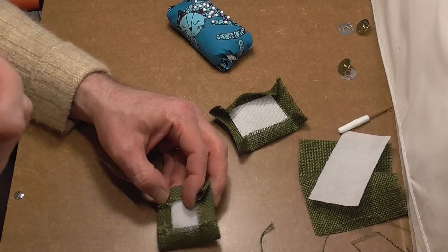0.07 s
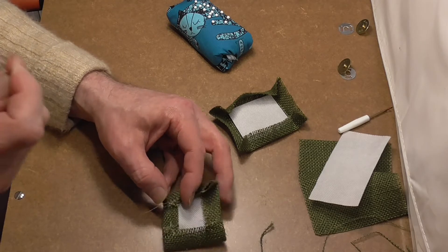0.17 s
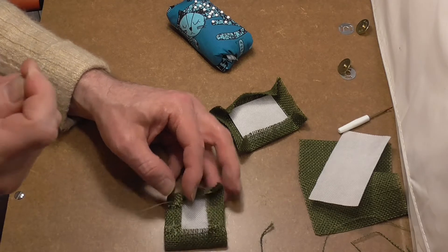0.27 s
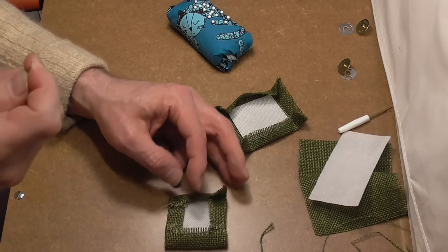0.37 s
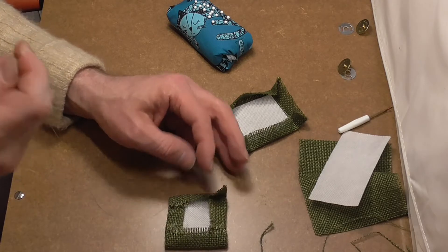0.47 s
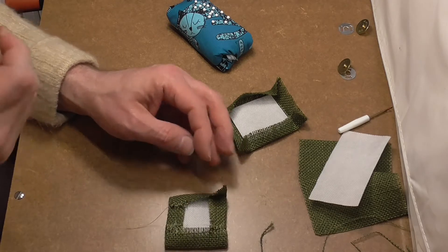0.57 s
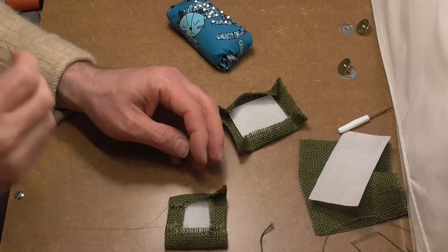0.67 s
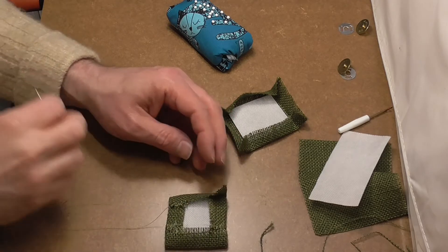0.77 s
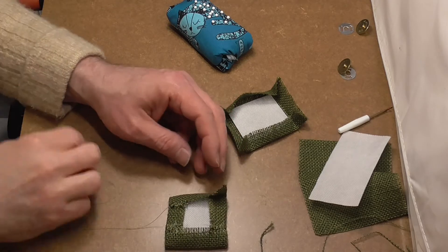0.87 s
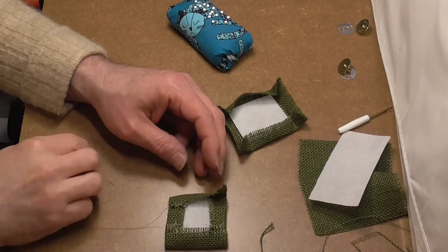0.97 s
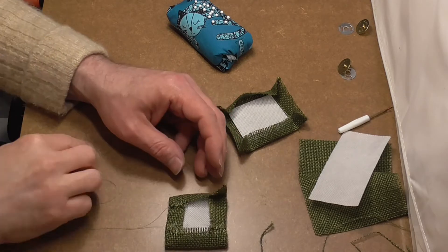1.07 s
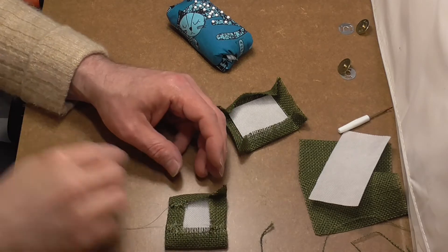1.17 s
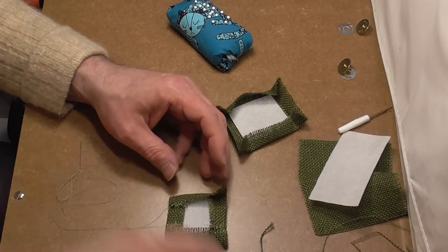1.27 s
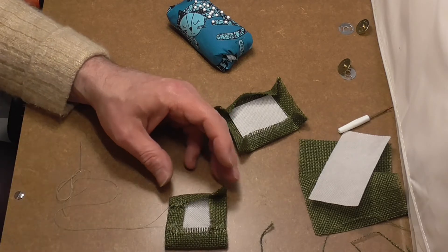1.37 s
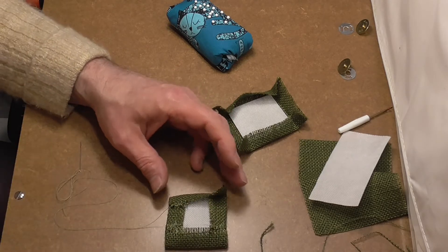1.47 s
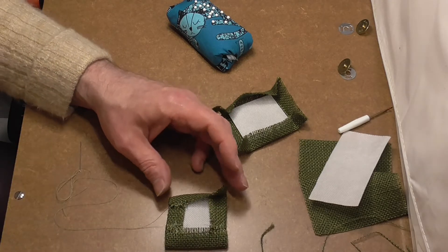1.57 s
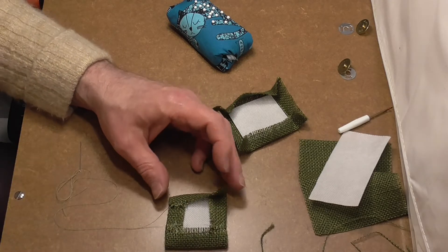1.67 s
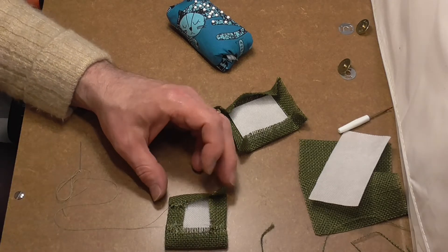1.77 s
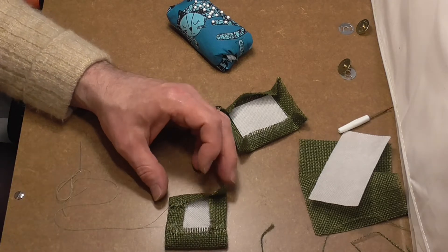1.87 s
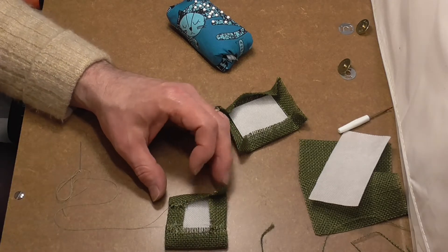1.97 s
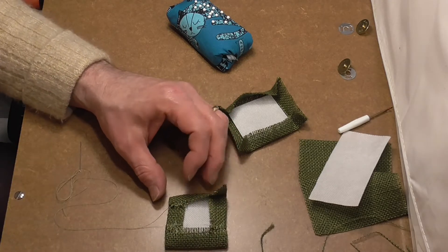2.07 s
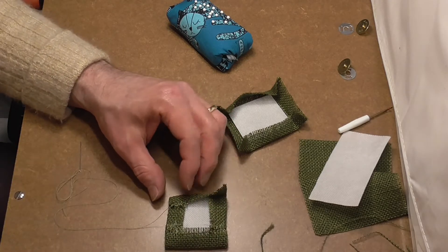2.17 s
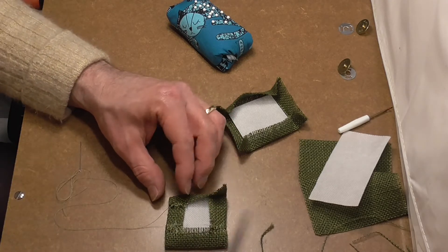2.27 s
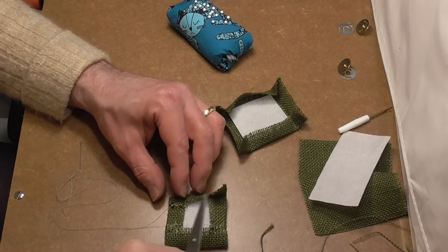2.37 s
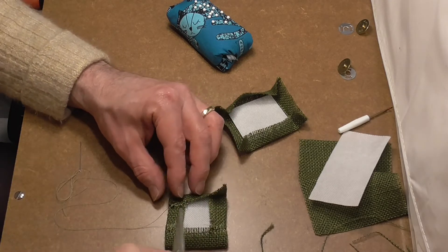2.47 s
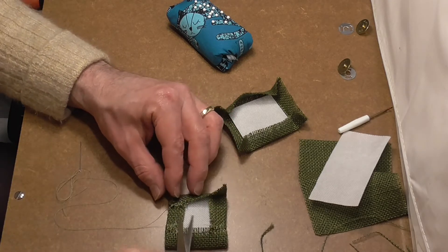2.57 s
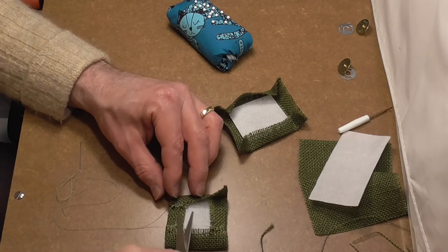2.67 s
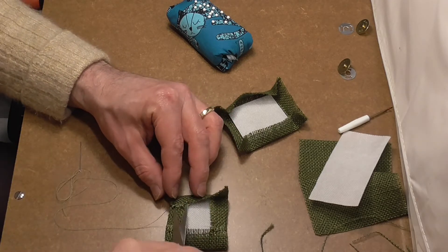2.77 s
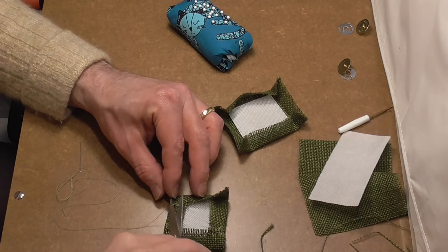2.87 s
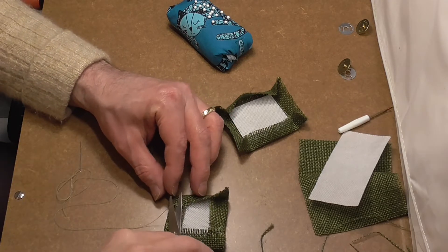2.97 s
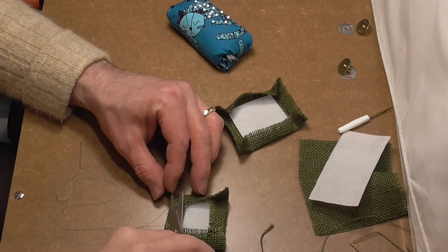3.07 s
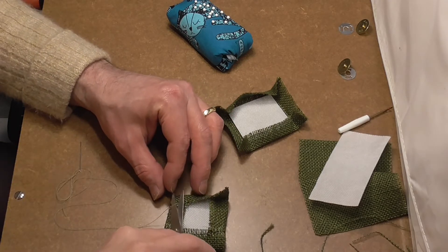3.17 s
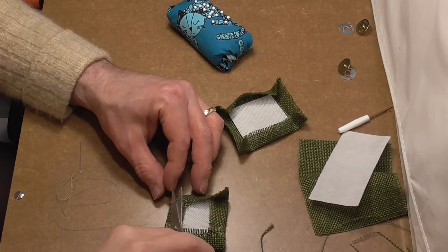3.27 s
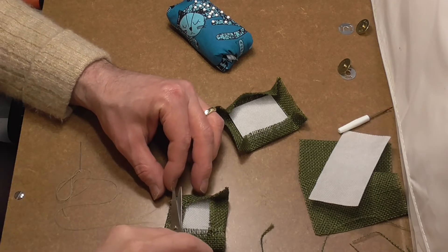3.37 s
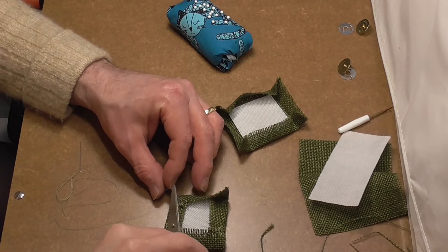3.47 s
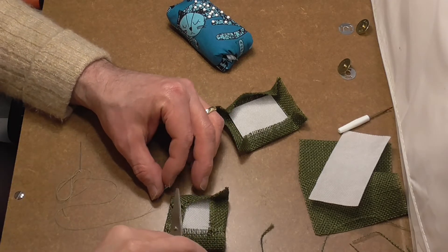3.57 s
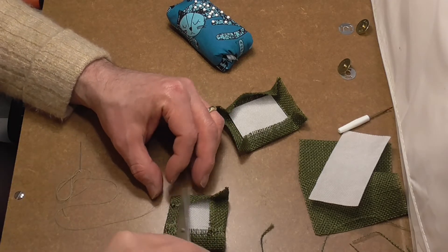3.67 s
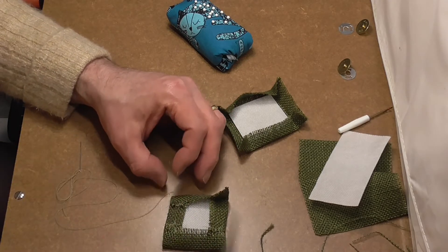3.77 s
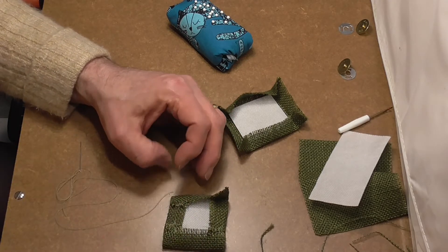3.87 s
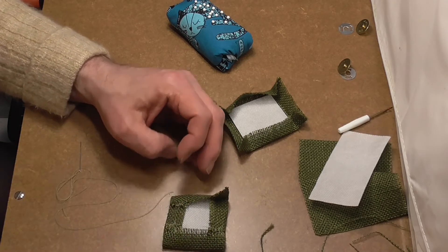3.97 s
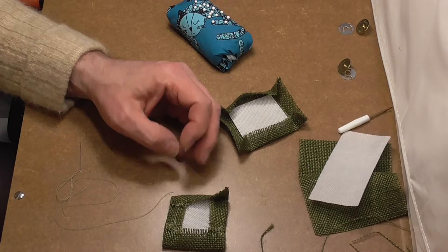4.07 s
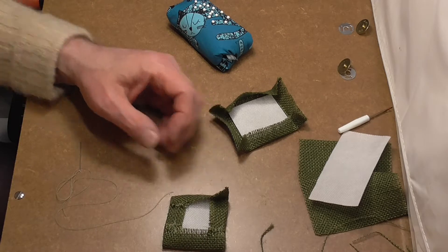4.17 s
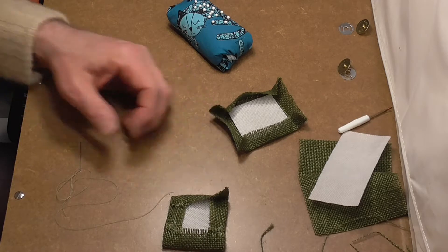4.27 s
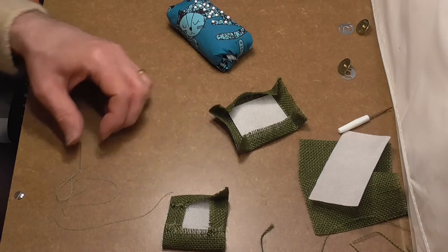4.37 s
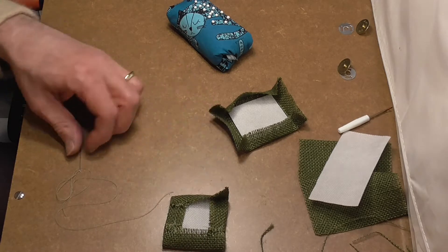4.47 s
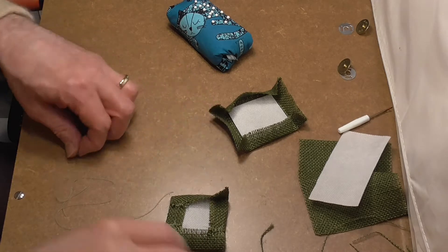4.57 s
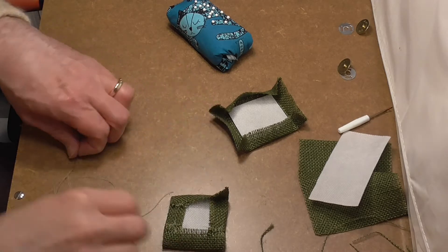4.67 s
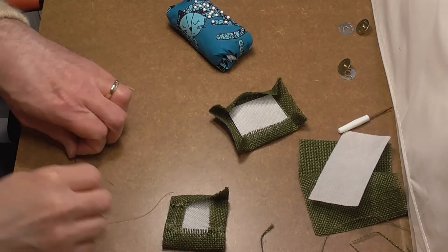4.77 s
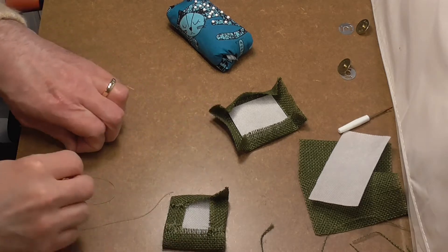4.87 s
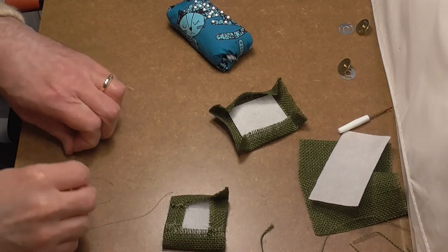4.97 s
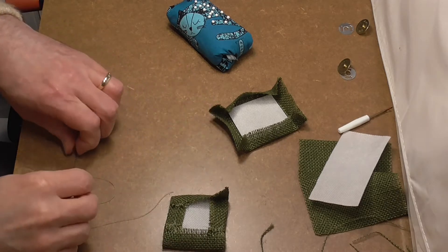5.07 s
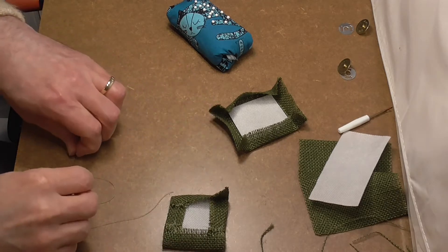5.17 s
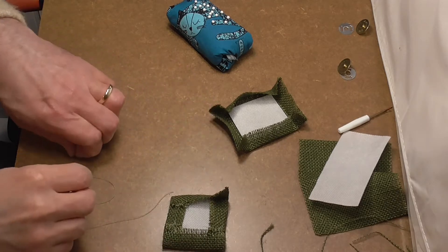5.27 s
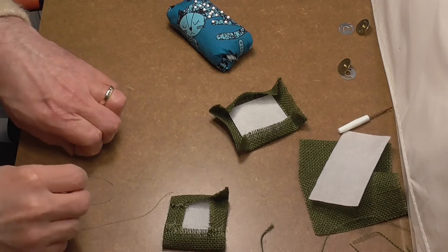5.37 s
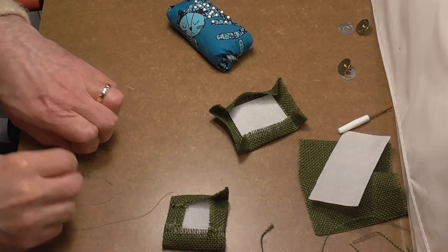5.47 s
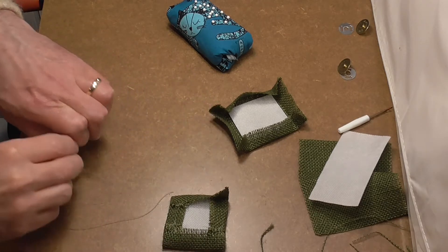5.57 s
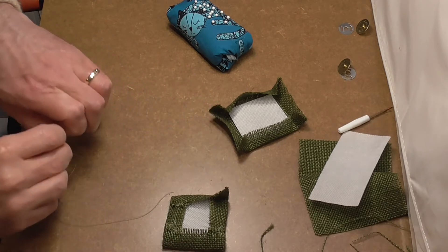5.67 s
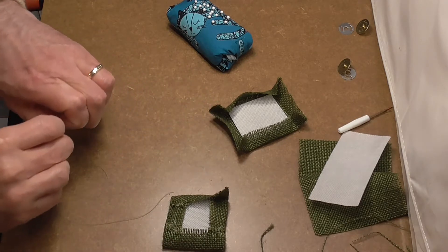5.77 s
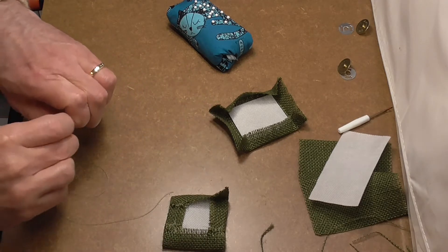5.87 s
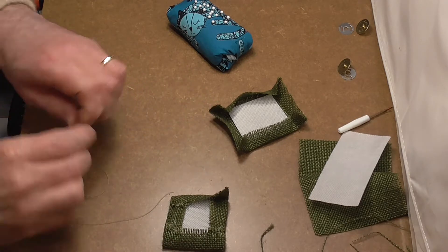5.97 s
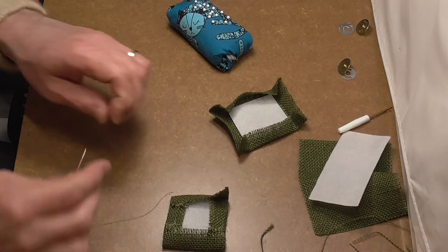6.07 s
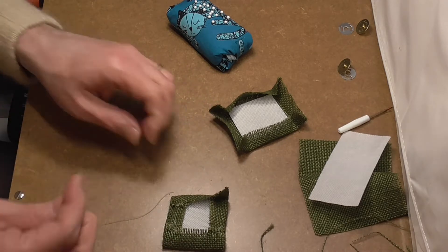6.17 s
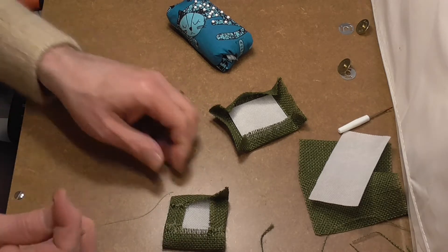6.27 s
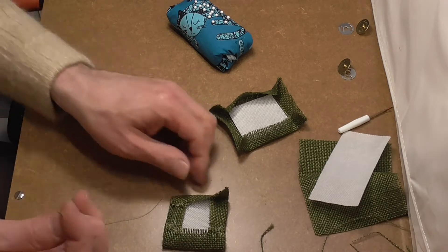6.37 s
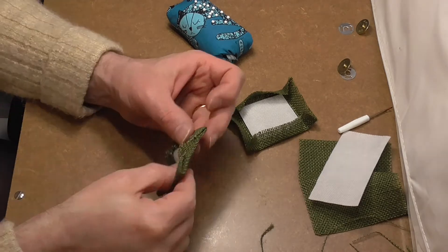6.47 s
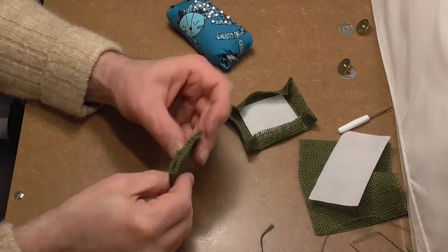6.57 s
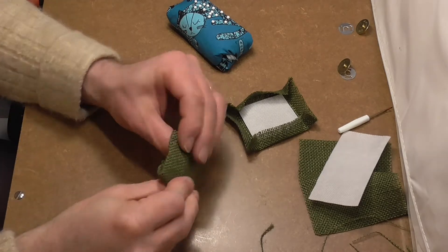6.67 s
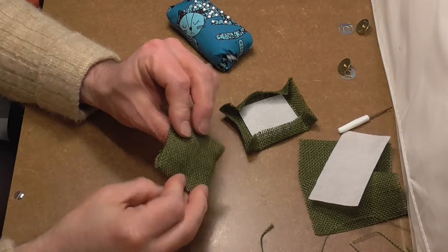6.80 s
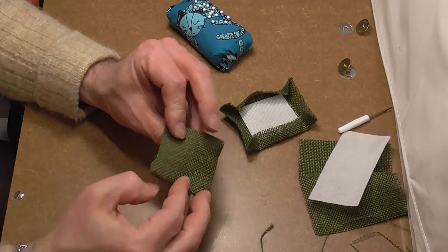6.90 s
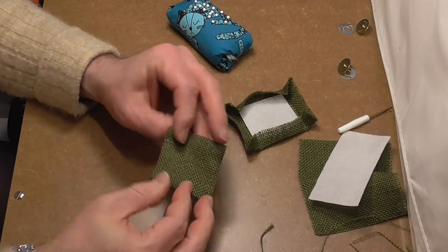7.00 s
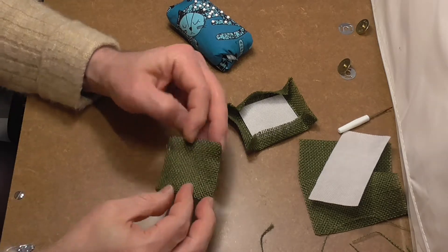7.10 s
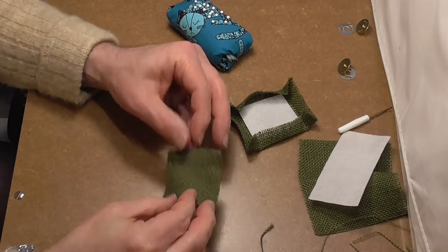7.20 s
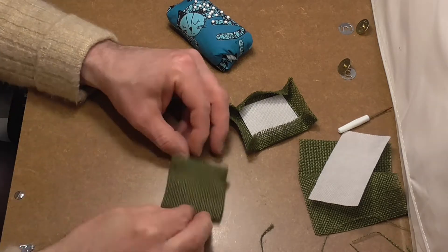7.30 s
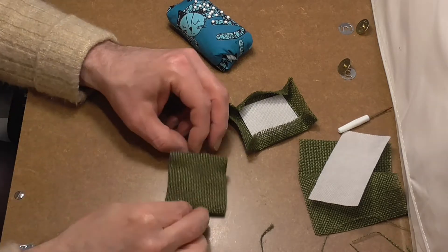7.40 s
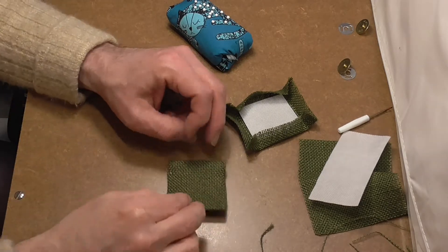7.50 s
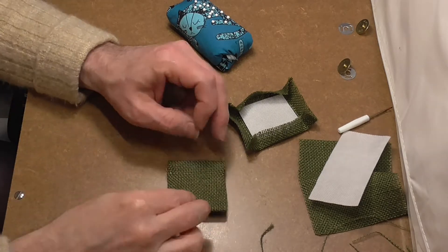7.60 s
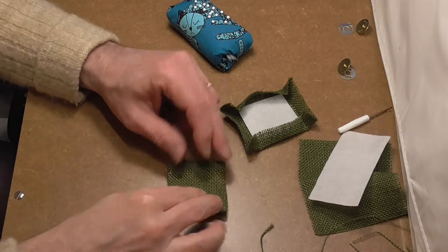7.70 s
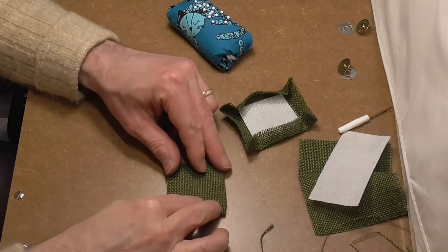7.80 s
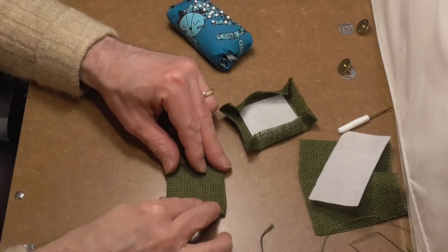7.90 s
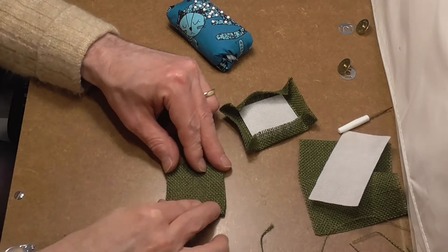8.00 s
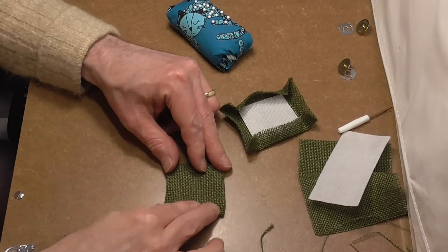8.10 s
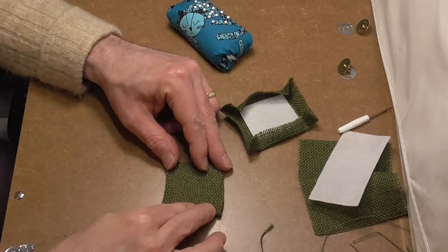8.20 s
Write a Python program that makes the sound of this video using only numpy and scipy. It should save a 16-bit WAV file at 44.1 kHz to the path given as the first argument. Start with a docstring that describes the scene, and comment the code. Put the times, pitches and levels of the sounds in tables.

```python
"""A wooden table in a quiet room, where someone sews by hand close to the microphone.
Thread is drawn through coarse cloth: shaped friction noise. Small steel scissors clatter as they are picked
up, snip once and are dropped back: decaying board and blade modes with noise bursts. They rock to rest
in ever shorter swings, each landing a soft pulse of tones and noise. Then fingers turn the cloth and pat
it flat with dull bursts. Short echoes, room noise and a faint hum surround everything."""
import sys
import numpy as np
from scipy import signal
from scipy.fft import rfft, irfft
from scipy.io import wavfile
from scipy.ndimage import uniform_filter1d

SR = 44100
rng = np.random.default_rng(int(sys.argv[2]) if len(sys.argv) > 2 else 0)


def waveform_to_disk(signal):
    """Save audio, clipped to [-1, 1], as 16-bit WAV at the path in sys.argv[1]."""
    frames = np.transpose(np.atleast_2d(signal))
    scaled = np.clip(frames, -1, 1) * 32767
    samples = np.round(scaled).astype(np.int16)
    wavfile.write(sys.argv[1], SR, samples)


N = 363384
RING_T = np.arange(SR // 4) / SR  # time axis of one short sound [s]

# Levels in the tables are relative: each function weights its own layers.
# Steel landing on the table: (time [s], board thud [dB], board knock [dB], steel ring [dB], click [dB],
# click pitch [Hz], low note favoured by the board there [Hz], high note favoured there [Hz])
BLOWS = [(1.6235, -37, -40, -42.5, -36, 5870, 255, 1010), (1.634, -31.5, -34, -44, -44, 6960, 348, 700),
         (1.7276, -32, -36, -34.5, -36, 6740, 358, 725), (1.7434, -53, -38.5, -45, -51, 6700, 383, 715),
         (1.7735, -36.5, -47, -40, -49, 6600, 360, 760), (1.7824, -51, -47, -46, -57, 6650, 410, 920),
         (1.7997, -37.5, -54, -47.5, -57, 5000, 500, 930), (1.816, -54, -45, -51, -59, 5000, 400, 690),
         (1.827, -50, -57, -57, -66, 4900, 400, 690), (2.0054, -39.5, -41.5, -51.5, -61, 6000, 241, 696),
         (2.0259, -35, -45, -46.5, -49, 7600, 350, 900), (2.036, -38.5, -42, -51, -53, 7500, 470, 1090),
         (2.0566, -30, -34, -69, -50, 7500, 263, 1730), (2.1231, -37, -43, -39.5, -41.5, 7050, 247, 1780),
         (2.15, -45.5, -45, -46.5, -51, 5200, 494, 690), (4.2237, -35, -35, -31, -29, 12500, 248, 1010),
         (4.2355, -59, -46, -37, -34.5, 10100, 248, 1050), (4.338, -35, -40, -33, -22, 7540, 440, 1240),
         (4.35, -37, -22, -43, -44, 7540, 480, 1204), (4.3618, -34, -38, -31, -28.5, 8000, 367, 1100),
         (4.4795, -46.5, -43, -50, -53, 6740, 382, 1230)]
# Spectrum of a steel click: (frequency [Hz], density [dB per Hz])
CLICK_SPECTRUM = [(200, -19), (1500, -6.5), (2000, -9.5), (2600, -20), (3300, -8.5), (4300, -4.5),
                  (5100, -1), (5900, -5.5), (6800, 1.5), (8300, 0), (9400, -2.5), (12000, -1.5),
                  (13500, -11), (16000, -29)]
# Spectrum of the low board thud: (frequency [Hz], density [dB per Hz])
THUD_SPECTRUM = [(30, -41), (105, -19.5), (135, -10.5), (165, -7), (250, -1), (305, -18), (360, 0.5),
                 (475, -4), (540, -9), (1000, -18), (2500, -48)]
# Spectrum of the woody knock: (frequency [Hz], density [dB per Hz])
KNOCK_SPECTRUM = [(100, -40), (300, -21), (600, -15), (760, -7), (920, -8), (1100, -3), (1270, -4.5),
                  (1620, -19), (1850, -18.5), (2650, -23), (3500, -23), (6000, -33), (15000, -65)]
# Likeness of table sounds at the two microphone ports: (frequency [Hz], correlation [0-1])
SAME = [(250, .96), (520, .8), (900, .95), (1250, .96), (2000, .76), (4500, .8), (8000, .36), (14000, .3)]


def amp(db):
    """Level to gain: 20 dB is a factor of ten in amplitude."""
    return 10 ** (np.asarray(db) / 20)


def read(points, hz):
    """Interpolation of a table of (frequency [Hz], value) on a logarithmic frequency axis."""
    f, value = np.transpose(points)
    return np.interp(np.log(hz + 1), np.log(f + 1), value)


def evened(x):
    """Power normalization: scales to rms 1."""
    return x / np.sqrt(np.mean(x ** 2) + 1e-20)


def struck(x, size=880):
    """Onset normalization: scales a hit so that its first 20 ms have rms 1."""
    return x / np.sqrt(np.mean(x[..., :size] ** 2) + 1e-20)


def add(mix, s, sound):
    """Superposition: mixes a sound in at time s, cut at the end of the mix."""
    part = mix[:, round(s * SR):][:, :sound.shape[-1]]
    part += sound[..., :part.shape[1]]


def paired(noise, same):
    """Interaural-style coherence: sums and differences of two noises set their likeness at the ports."""
    size = noise.shape[1]
    mid, side = rfft(noise)
    likeness = np.clip(read(same, np.fft.rfftfreq(size, 1 / SR)), -1, 1)
    mid = mid * np.sqrt((1 + likeness) / 2)
    side = side * np.sqrt((1 - likeness) / 2)
    return irfft(np.array([mid + side, mid - side]), size)


def coloured(x, spectrum, size=2048):
    """Minimum-phase filtering: the Hilbert transform of the log gain gives a causal response."""
    log_gain = np.log(amp(read(spectrum, abs(np.fft.fftfreq(size, 1 / SR)))))
    taps = np.fft.ifft(np.exp(np.conj(signal.hilbert(log_gain)))).real
    return signal.oaconvolve(x, taps[None], axes=1)[:, :x.shape[1]]


def balanced(x, balance):
    """Level difference between ports: leans each frequency to the left or the right."""
    lean = read(balance, np.fft.rfftfreq(N, 1 / SR)) / 2
    return irfft(rfft(x) * amp([lean, -lean]), N)


def fade(t60):
    """Exponential decay: a damped mode loses 60 dB in t60 seconds."""
    return np.exp(-np.log(1000) * RING_T / t60)


def bump(f, hz, octaves=0.18):
    """Resonance weighting: 1 at hz, falling to 0 on either side along a log-frequency bell."""
    return np.exp(-(np.log2(f / hz) / octaves) ** 2)


def focused(spectrum, hz, lift_db):
    """Position-dependent excitation: the point of contact favours one region of a spectrum."""
    f = np.geomspace(30, 17000, num=240)
    return np.transpose([f, read(spectrum, f) + lift_db * bump(f, hz)])


def favoured(modes, hz, lift_db, octaves):
    """Modal participation: the point of contact feeds the modes near one note most."""
    return [(f, db + lift_db * bump(f, hz, octaves), t60) for f, db, t60 in modes]


def burst(spectrum, t60, rise):
    """High modal density: countless short-lived modes merge into a dying puff of coloured noise."""
    noise = paired(rng.standard_normal((2, len(RING_T))), SAME)
    onset = 1 - np.exp(-(RING_T / rise) ** 2)
    return struck(coloured(noise * fade(t60) * onset, spectrum))


def ring(modes, scatter_db, detune, rise):
    """Modal superposition: damped sines whose strengths and port phases vary with the striking point."""
    sound = 0
    draws = rng.standard_normal((len(modes), 3))
    for k, ((hz, db, t60), (strength, pitch, phase)) in enumerate(zip(modes, draws)):
        lead = np.arccos(read(SAME, hz)) * phase * np.array([[.35], [-.35]])  # opposite at the two ports
        wave = np.sin(2 * np.pi * hz * (1 + detune * pitch) * RING_T + lead)
        sound = sound + (-1) ** k * amp(db + scatter_db * strength) * fade(t60) * wave
    return struck(sound * (1 - np.exp(-RING_T / rise)))


def hiss(spectrum, same):
    """Stationary noise: steady, coloured and partly alike at both ports."""
    return evened(coloured(paired(rng.standard_normal((2, N)), same), spectrum))


def grains(per_s):
    """Stick-slip: a random train of tiny catches of uneven size."""
    # Spectrum of the catches: (frequency [Hz], density [dB per Hz])
    grit = [(400, -1), (1200, -0.5), (2500, -1.5), (3050, -5), (4300, 4.5), (5200, -1), (6200, -4),
            (12000, -8.5), (16000, -40)]
    spread_db = 1.5
    size_db = spread_db * np.minimum(rng.exponential(1, N), 4)
    catches = amp(size_db) * (rng.random(N) < per_s / SR)
    return evened(coloured(paired(catches * rng.standard_normal((2, N)), SAME), grit))


def air(waver_rad=0.93):
    """Background noise: low room noise and microphone hiss with faint hum tones of wandering phase."""
    # Spectrum of the still room: (frequency [Hz], density [dB per Hz])
    air_spectrum = [(20, -38.5), (45, -13), (75, -13), (135, -4), (260, 0), (320, -5.5), (420, -10),
                    (800, -13.5), (1350, -18), (1850, -27.5), (2800, -28.5), (4500, -27.5), (5700, -31.5),
                    (9000, -24.5), (12000, -24.5), (16000, -30)]
    # Hum tones: (frequency [Hz], rms level [dB])
    hum_tones = [(73, -77), (120, -70.5), (194, -78), (280, -71.5), (840, -84)]
    # Likeness of the room noise at the ports: (frequency [Hz], correlation [-1 to 1])
    air_same = [(60, -0.31), (150, 0.86), (380, -0.00033), (950, -0.39), (2380, 0.0034), (5980, 0.005),
                (15000, 0.13)]
    # Balance of noise and hum: (frequency [Hz], left minus right [dB])
    air_balance = [(60, -0.83), (150, -0.34), (380, -0.82), (950, 0.52), (2380, -1.4), (5980, 0.54),
                   (15000, -2)]
    t = np.arange(N) / SR
    knots = np.linspace(0, t[-1], num=50)
    hum = 0
    for hz, db in hum_tones:
        phase = waver_rad * np.interp(t, knots, rng.standard_normal(len(knots)))
        hum = hum + amp(db) * np.sqrt(2) * np.sin(2 * np.pi * hz * t + phase)
    return balanced(amp(-58.54) * hiss(air_spectrum, air_same) + hum, air_balance)


def cloth(uneven_db=1.5):
    """Sliding friction: skin and thread cross the weave with uneven pressure; fibres catch and let go."""
    # A hand or sleeve slides over the table: (start [s], length [s], level [dB], change by the end [dB])
    slides = [(0.56, 0.56, -67, -2), (1.375, 0.23, -78, 8), (2.548, 0.095, -73, 2.5),
              (4.056, 0.25, -73.5, 7), (5.158, 0.19, -69, -5.5), (6.362, 0.5, -74.5, 7),
              (6.875, 0.55, -64.5, -3), (7.61, 0.21, -69, -3.5), (7.83, 0.46, -62, -8)]
    # Brief bright swishes of thread, cloth or blade: (middle [s], half length [s], level [dB])
    swishes = [(0.36, 0.14, -62.5), (1.478, 0.13, -70), (2.21, 0.044, -63), (2.651, 0.0096, -59.5),
               (3.531, 0.02, -61), (3.755, .016, -64.5), (4.205, 0.21, -70), (6.405, 0.076, -66.5),
               (6.67, 0.04, -62), (6.794, 0.037, -52), (7.386, 0.14, -65.5), (7.902, 0.023, -66)]
    # Spectrum of skin on the weave: (frequency [Hz], density [dB per Hz])
    rub_spectrum = [(200, -1.5), (600, 15), (1400, 5.5), (2200, 5.5), (4200, 5), (7000, 2.5), (12000, -16),
                    (16000, -32)]
    # Spectrum of the bright thread hiss: (frequency [Hz], density [dB per Hz])
    thread_spectrum = [(1500, -29), (5000, -8.5), (7500, 0.5), (10000, -1), (12500, -0.5), (14500, -11.5),
                       (16000, -19)]
    attack_s, release_s = 0.023, 0.034
    swish_shape = 1.36  # 1 = pointed, 2 = a round bell
    t = np.arange(N) / SR
    rub = np.zeros(N)
    for s, length, db, change_db in slides:
        attack = np.clip((t - s) / attack_s, 0, 1)
        release = np.exp(-np.maximum(t - s - length, 0) / release_s)
        rub += attack * release * amp(db + change_db * np.clip((t - s) / length, 0, 1))
    thread = amp(-2.5) * rub  # the weave hisses along with every slide
    for s, half_s, db in swishes:
        thread += amp(db) * np.exp(-abs((t - s) / half_s) ** swish_shape)
    wander = evened(uniform_filter1d(rng.standard_normal(N), size=2000))
    pressure = evened(amp(uneven_db * wander))
    fibres = amp(-8) * rub * grains(per_s=350)
    skin = amp(-2) * rub * hiss(rub_spectrum, SAME)
    return pressure * (fibres + skin + amp(-2.5) * thread * hiss(thread_spectrum, SAME))


def fingers():
    """Soft impact: yielding fingertips push the board slowly, so low notes prevail, and scuff its surface."""
    # Fingers on table and cloth: (time [s], thud [dB], knock [dB], scuff [dB], favoured board note [Hz])
    taps = [(1.015, -50.5, -62, -63, 176), (3.013, -48, -58, -44.5, 257), (3.217, -61, -70, -62.5, 260),
            (5.187, -51.5, -60, -62.5, 256), (6.387, -48, -55, -55, 268), (6.907, -74, -51, -75, 480),
            (7.358, -50.5, -59, -67, 137), (7.384, -49.5, -79, -69, 134), (7.408, -59, -68, -78, 456),
            (7.462, -57.5, -63, -76, 460), (7.639, -59, -63, -61, 400), (7.859, -50.5, -53.5, -74, 206),
            (7.899, -49.5, -54.5, -82, 456)]
    # Spectrum of the soft thud: (frequency [Hz], density [dB per Hz])
    pat_spectrum = [(30, -25), (70, -5), (140, 6), (200, 0), (270, 1), (350, -5.5), (480, -4), (700, -11.5),
                    (2000, -50)]
    # Spectrum of skin scuffing the surface: (frequency [Hz], density [dB per Hz])
    scuff_spectrum = [(500, 3), (1500, 3), (2100, 2), (2800, -6), (3800, -0.5), (6000, -16), (10000, -15),
                      (16000, -44)]
    out = np.zeros((2, N))
    for s, thud_db, knock_db, scuff_db, note_hz in taps:
        pat = amp(thud_db - 2.5) * burst(focused(pat_spectrum, note_hz, lift_db=9), t60=0.1, rise=0.0065)
        knock = amp(knock_db - 9.5) * burst(KNOCK_SPECTRUM, t60=0.055, rise=0.00018)
        scuff = amp(scuff_db - 7.5) * burst(scuff_spectrum, t60=0.05, rise=0.001)
        add(out, s, pat + knock + scuff)
    return out


def ticks():
    """Hard light contact: needle and small steel parts click briefly without shaking the board."""
    # Light ticks of needle and steel: (time [s], click [dB], click pitch [Hz])
    tick_rows = [(1.137, -54, 10000), (1.15, -42, 10100), (1.179, -51.5, 9550), (1.1905, -46, 8250),
                 (1.212, -54, 6500), (2.041, -47, 7400), (2.184, -58, 5000), (3.914, -50, 9000),
                 (4.3351, -42, 4700), (4.369, -42, 11500), (4.4025, -39.5, 12000), (4.4075, -46, 11500),
                 (4.595, -56, 6800), (4.672, -58.5, 6140), (5.3228, -50.5, 10300)]
    out = np.zeros((2, N))
    for s, click_db, click_hz in tick_rows:
        click = burst(focused(CLICK_SPECTRUM, click_hz, lift_db=6.5), t60=0.012, rise=0.0003)
        add(out, s, amp(click_db - 8.5) * click)
    return out


def board(thud_db, knock_db, low_hz, high_hz, low_spot_db=8, high_spot_db=9):
    """Plate vibration: the table top answers one contact with a low thud and a short woody knock."""
    # Low modes of the table top: (frequency [Hz], level [dB], t60 [s])
    low_modes = [(140, -11, .18), (190, -16, .13), (248, -2.5, .13), (346, 0, .14), (372, -4, .13),
                 (405, -9, .11), (452, -9, .11), (476, -1, .17)]
    # High modes of the table top: (frequency [Hz], level [dB], t60 [s])
    high_modes = [(693, -2, .13), (790, -4, .2), (827, -3, .14), (920, -3, .17), (1053, 0, .13),
                  (1107, -1, .1), (1180, -2, .1), (1232, -2, .1), (1318, -10, .09), (1476, -17, .12),
                  (1760, -9, .08)]
    low = ring(favoured(low_modes, low_hz, low_spot_db, octaves=.2), scatter_db=1.5, detune=0.012, rise=0.0022)
    low_puff = burst(focused(THUD_SPECTRUM, low_hz, low_spot_db), t60=0.076, rise=0.002)
    thud = amp(-8.5) * low + amp(-6.5) * low_puff
    spot_modes = favoured(high_modes, high_hz, high_spot_db, octaves=.12)
    high = ring(spot_modes, scatter_db=2, detune=0.006, rise=0.0015)
    high_puff = burst(focused(KNOCK_SPECTRUM, high_hz, high_spot_db), t60=0.034, rise=0.00067)
    knock = amp(-13) * high + amp(-8.5) * high_puff
    return amp(thud_db) * thud + amp(knock_db) * knock


def clatter():
    """Impact excitation: every contact shakes the board; landing steel also clicks and rattles at the pivot."""
    # Dull bumps of the handles, which leave the blades silent:
    # (time [s], thud [dB], knock [dB], low board note [Hz], high board note [Hz])
    handle_bumps = [(1.562, -35, -48, 342, 1050), (1.5772, -44.5, -40.5, 480, 1080),
                    (1.585, -33, -46, 257, 1030), (1.608, -35, -45, 259, 890),
                    (1.7504, -29.5, -36, 360, 910), (1.758, -35.5, -54, 362, 1060),
                    (2.063, -34.5, -44, 345, 1050), (2.072, -40, -35.5, 477, 950),
                    (4.3572, -52, -30, 380, 1200), (4.366, -42, -32, 350, 1120),
                    (4.3716, -33, -36, 344, 1250), (4.381, -33, -38, 465, 1100),
                    (4.387, -36, -32, 450, 800), (4.397, -44, -30.5, 380, 1310),
                    (4.409, -53, -32.5, 470, 820), (4.42, -38, -37, 430, 1150), (4.43, -48, -44, 374, 780),
                    (4.504, -52, -46.5, 380, 1030), (4.531, -47, -66, 255, 1030)]
    # Spectrum of the rattling pivot: (frequency [Hz], density [dB per Hz])
    rattle_spectrum = [(600, 0), (1500, -6), (2000, -0.5), (2600, -12), (3300, 7.5), (4200, -3),
                       (5000, 0.5), (5800, -6), (7000, -7), (12000, -5.5), (16000, -21)]
    out = np.zeros((2, N))
    for s, thud_db, knock_db, ring_db, click_db, click_hz, low_hz, high_hz in BLOWS:
        wood = board(thud_db, knock_db, low_hz, high_hz)
        rattle = amp(ring_db - 10) * burst(rattle_spectrum, t60=0.115, rise=0.0022)
        click = burst(focused(CLICK_SPECTRUM, click_hz, lift_db=7), t60=0.016, rise=0.0009)
        add(out, s, wood + rattle + amp(click_db - 6.5) * click)
    for s, *contact in handle_bumps:
        add(out, s, board(*contact))
    return out


def blades():
    """Beating: each blow rings two blades never quite in tune, and differently at each spot."""
    # Modes of the scissors, a short bright clink over a faint longer ring:
    # (frequency [Hz], level [dB], t60 [s])
    steel_modes = [(3100, -16, .09), (3430, -12.5, .12), (5030, 0, .017), (5120, -17, .09),
                   (6190, -18, .07), (6650, -2, .022), (9200, 0, .014), (11150, -15, .05),
                   (12100, -13, .04)]
    out = np.zeros((2, N))
    for s, _, _, ring_db, _, click_hz, _, _ in BLOWS:
        modes = favoured(steel_modes, click_hz, lift_db=3, octaves=.2)
        pair = sum(ring(modes, scatter_db=2.5, detune=.013, rise=.0004) for _ in range(2))
        add(out, s, amp(ring_db - 10) * pair)
    return out


def scrapes(grains_per_s=2900):
    """Dense stick-slip: one surface skids over another in many tiny catches."""
    # Steel on wood, or a nail on the weave: (middle [s], half length [s], level [dB])
    scrape_rows = [(1.637, 0.02, -50), (2.057, 0.0091, -53), (4.366, 0.014, -37), (4.405, 0.023, -45.5),
                   (5.192, 0.017, -67.5), (5.323, 0.0075, -58.5), (5.609, 0.019, -61), (6.91, .02, -63.5),
                   (7.25, 0.037, -66.5), (7.353, 0.016, -64.5)]
    t = np.arange(N) / SR
    envelope = sum(amp(db) * np.exp(-((t - s) / half_s) ** 2) for s, half_s, db in scrape_rows)
    return grains(grains_per_s) * envelope


def squeaks():
    """Friction-driven resonance: sliding feeds one resonance for a moment, heard as narrow-band noise."""
    # Things sliding: (middle [s], level [dB], pitch [Hz], half length [s], width [share of the pitch])
    squeak_rows = [(2.648, -66, 3480, .013, .03), (3.528, -68, 3430, .016, .06),
                   (5.611, -60, 1290, .018, .1), (7.657, -68, 1950, .02, .45)]
    out = np.zeros((2, N))
    t = RING_T - RING_T.mean()
    f = np.fft.rfftfreq(len(t), 1 / SR)
    for s, db, hz, half_s, spread in squeak_rows:
        noise = rfft(paired(rng.standard_normal((2, len(t))), SAME))
        note = irfft(noise / (1 + ((f / hz - 1) / spread) ** 2), len(t))
        add(out, s + t[0], amp(db) * evened(note) * np.exp(-(t / half_s) ** 2))
    return out


def snip(s=3.5818, snap_db=-34.5, chatter_db=-47):
    """Sudden release: the blades snap through thread, a little to the right, chatter, and the shanks ring."""
    # Spectrum of the snap: (frequency [Hz], density [dB per Hz])
    snap_spectrum = [(300, -33), (900, -21.5), (1330, -9), (1800, -14), (2700, -18), (3400, -7.5),
                     (7100, -8.5), (7650, 4.5), (8300, 1), (9300, -4), (10400, -4), (11050, 8), (11800, -1),
                     (13000, 5), (13800, -1), (16000, -15)]
    # Spectrum of the blades chattering after it: (frequency [Hz], density [dB per Hz])
    chatter_spectrum = [(500, -8), (2500, -4.5), (4200, 4), (6000, 0), (11000, 0), (13500, -3),
                        (16000, -18)]
    # modes: (frequency [Hz], level [dB], t60 [s])
    shank_modes = [(566, -9, .26), (1250, -4, .12), (1330, 1, .15), (1390, 0, .15), (4390, -3, .1)]
    out = np.zeros((2, N))
    snap = amp(snap_db) * burst(snap_spectrum, t60=0.011, rise=0.00077)
    chatter = amp(chatter_db) * burst(chatter_spectrum, t60=.1, rise=0.0011)
    shanks = amp(-59) * ring(shank_modes, scatter_db=1, detune=.003, rise=.005)
    add(out, s, (snap + chatter + shanks) * amp([[-1.7], [1.7]]))
    return out


def rocks(start_s, swings):
    """Damped rocking: swings shorten geometrically, giving rows (time [s], low note [dB], high note [dB])."""
    first_swing_s, swing_ratio = .0808, .861
    far_side_share = .41  # the far side lands this far through the swing
    far_side_fade_db_per_s = 16
    # (near side [dB], far side [dB], hold [s], then fade [dB per s]) of the low and the high note
    notes = [(-45, -52, .375, 150), (-41, -40.5, .16, 92)]
    rows, age = [], 0
    for k in range(swings):
        swing_s = first_swing_s * swing_ratio ** k
        for side, at in enumerate([age, age + far_side_share * swing_s]):
            levels = []
            for near_db, far_db, hold_s, fade_db in notes:
                side_db = (near_db, far_db - far_side_fade_db_per_s * at)[side]
                levels.append(side_db - fade_db * max(at - hold_s, 0))
            rows.append((start_s + at, *levels))
        age += swing_s
    return rows


def rocking(start_s=4.503, swings=10, low_hz=385, rise_hz_per_s=70, low_s=0.0052, high_s=0.0058,
            grit_db=-21, pitch_spread=.06, uneven_db=2):
    """Rolling contact: soft pushes sound the board for a few cycles, a little higher as swings quicken."""
    # Upper notes of each landing: (frequency [Hz], level [dB])
    rock_notes = [(1050, -12), (1170, -12.5), (1260, -17)]
    out = np.zeros((2, N))
    t = RING_T - RING_T.mean()
    draws = rng.random((2 * swings, len(rock_notes) + 2))
    for (s, low_db, high_db), (spot, force, *phases) in zip(rocks(start_s, swings), draws):
        shift = 1 + pitch_spread * (spot - .5)  # each landing is at a slightly different spot
        notes = sum(amp(db) * np.sin(2 * np.pi * (hz * shift * t + cycles))
                    for (hz, db), cycles in zip(rock_notes, phases))
        noise = paired(rng.standard_normal((2, len(t))), SAME)
        note_hz = shift * (low_hz + rise_hz_per_s * (s - start_s))
        low = np.sin(2 * np.pi * note_hz * t) + amp(-16) * evened(coloured(noise, THUD_SPECTRUM))
        high = notes + amp(grit_db) * evened(coloured(noise, KNOCK_SPECTRUM))
        low_push = amp(low_db) * np.exp(-(t / low_s) ** 2) * low
        high_push = amp(high_db) * np.exp(-(t / high_s) ** 2) * high
        add(out, s + t[0], amp(uneven_db * (force - .5)) * (low_push + high_push))
    return out


def room(x, wet_db, near_db=-7, near_t60=0.11, far_db=-13):
    """Reverberation: a quick flutter from the table and nearby things, then the short tail of the room."""
    # Reverberation time of the tail: (frequency [Hz], t60 [s])
    tail_t60 = [(200, 0.34), (1500, 0.31), (5000, 0.28), (14000, 0.22)]
    near_spectrum = [(200, -10), (1200, 3.5), (3500, -1), (15000, -2)]  # (Hz, dB)
    noise = paired(rng.standard_normal((2, len(RING_T))), SAME)
    near = coloured(noise * fade(near_t60) * (RING_T > .003), near_spectrum)
    hz, t, z = signal.stft(paired(rng.standard_normal((2, len(RING_T))), SAME), SR, nperseg=256)
    decay = np.exp(-np.log(1000) * t / read(tail_t60, hz)[:, None])  # each frequency dies at its own rate
    tail = signal.istft(z * decay, SR, nperseg=256)[1]
    far = tail[:, :len(RING_T)] * (RING_T > .009)
    echoes = amp(near_db) * near / np.linalg.norm(near[0]) + amp(far_db) * far / np.linalg.norm(far[0])
    return x + amp(wet_db) * signal.oaconvolve(x, echoes, axes=1)[:, :N]


def scene():
    """Direct-to-reverberant ratio: blades, snip and rocking arrive with weaker echoes than the rest."""
    # Balance of the table sounds: (frequency [Hz], left minus right [dB])
    table_balance = [(200, -1.4), (1200, -1), (6000, -0.5), (8500, 1), (10000, -0.5), (12000, -2.5),
                     (15000, -4)]
    table = room(cloth() + fingers() + ticks() + clatter() + scrapes() + squeaks(), wet_db=0)
    direct = room(blades() + snip() + rocking(), wet_db=-5)
    return balanced(table + direct, table_balance) + air()


def record(dry):
    """Band limiting: a linear-phase low-pass removes the highest treble."""
    edge_hz = 16050
    low_pass = signal.firwin(511, edge_hz, window=("kaiser", 9), fs=SR)
    return signal.oaconvolve(dry, low_pass[None], "same")


dry = scene()
out = record(dry)
waveform_to_disk(out)
```